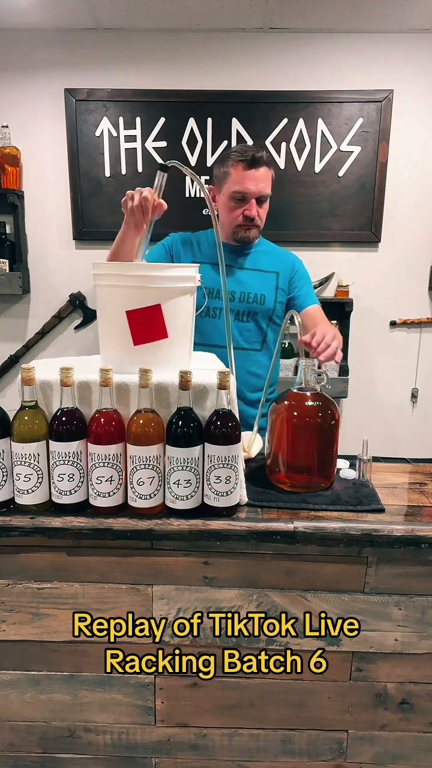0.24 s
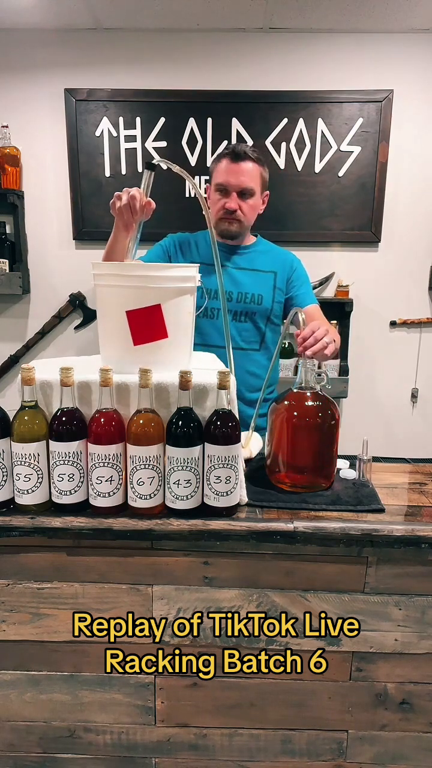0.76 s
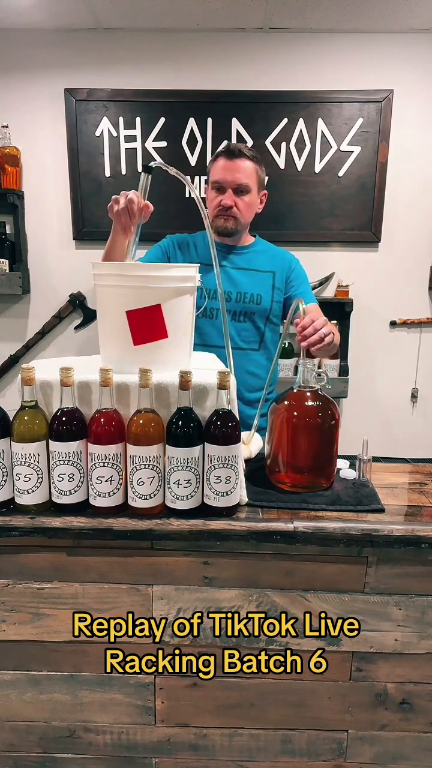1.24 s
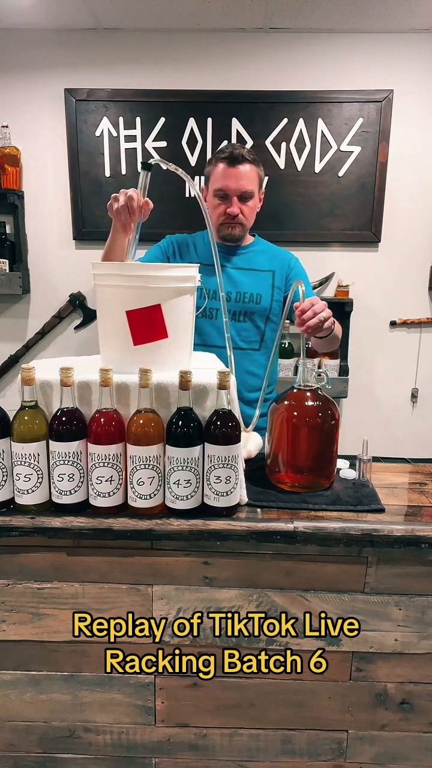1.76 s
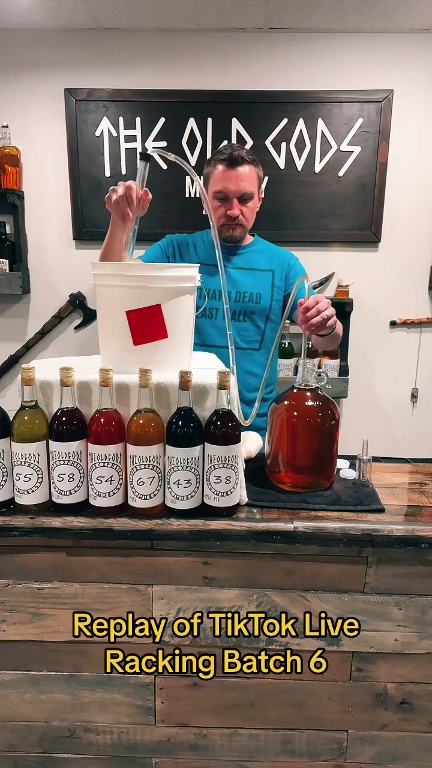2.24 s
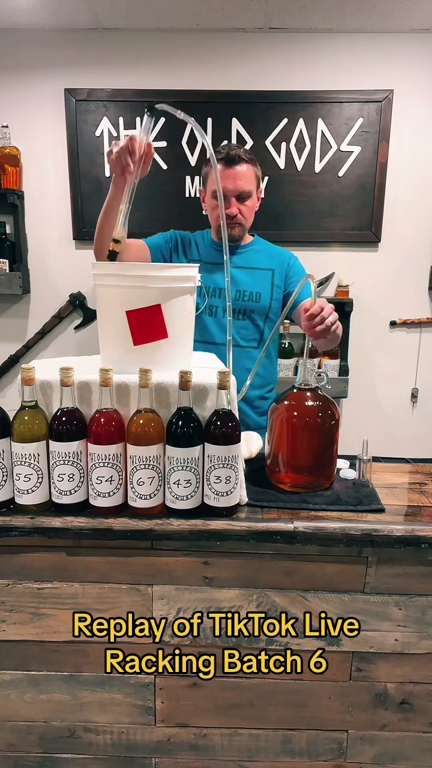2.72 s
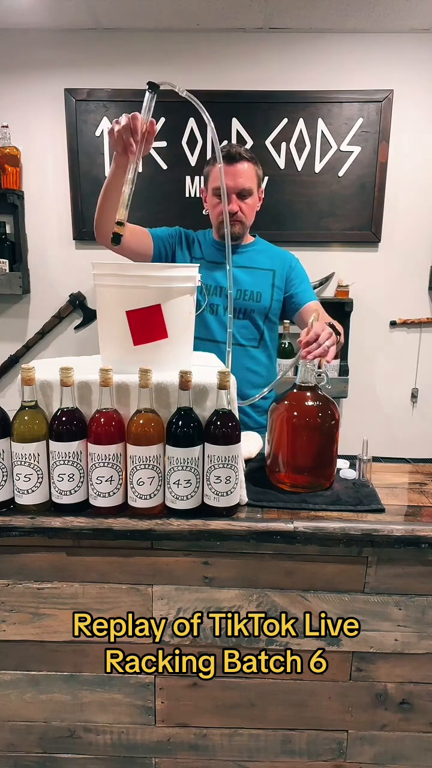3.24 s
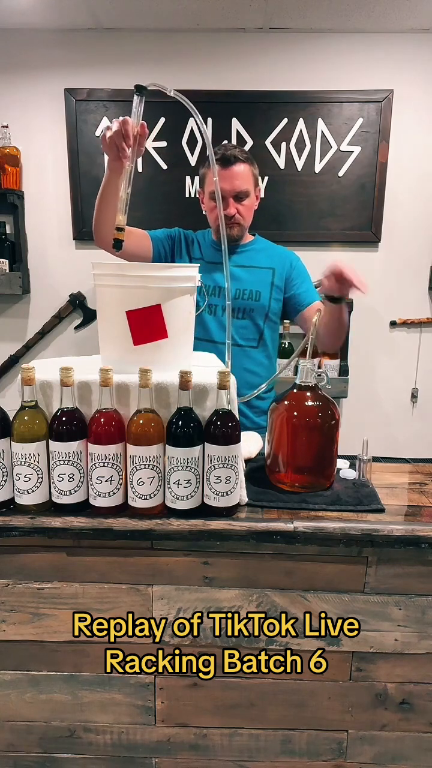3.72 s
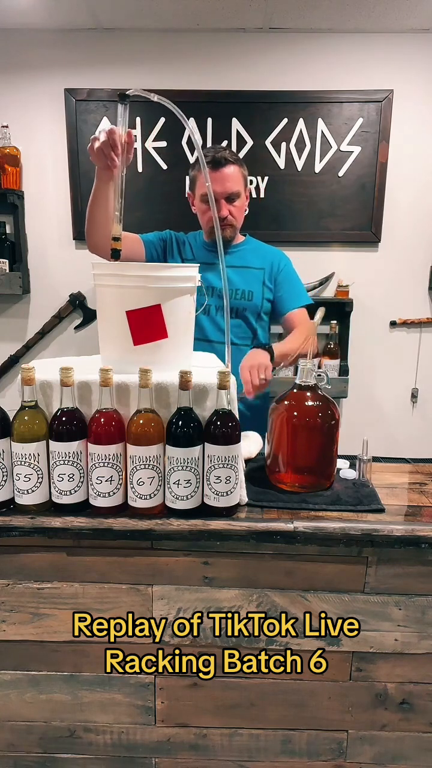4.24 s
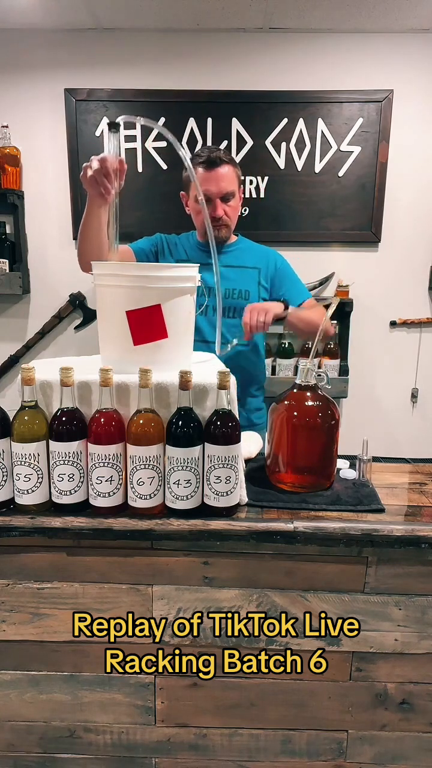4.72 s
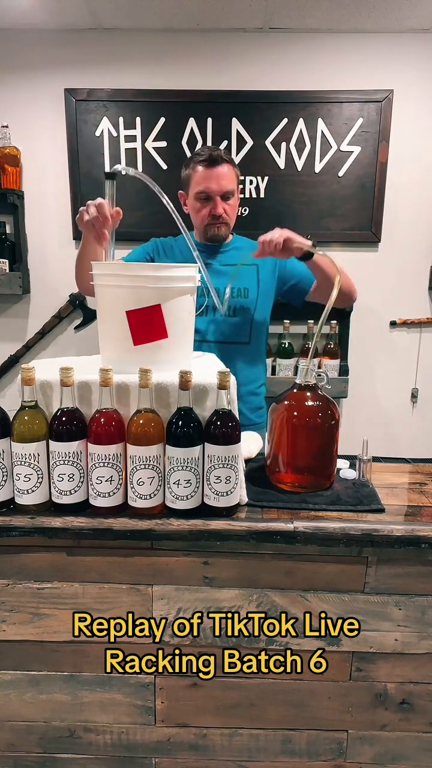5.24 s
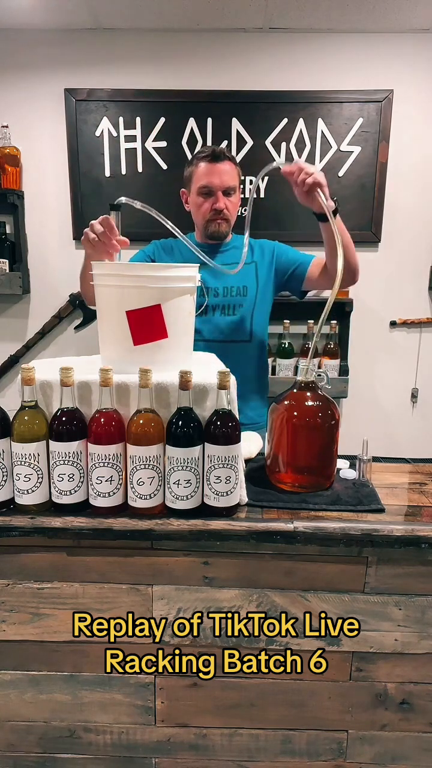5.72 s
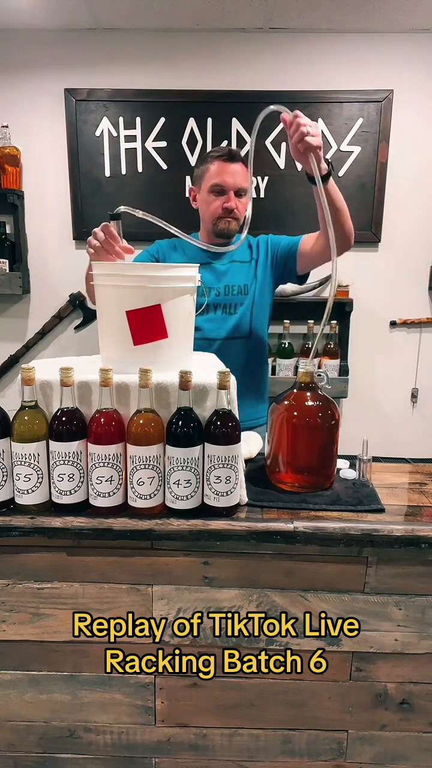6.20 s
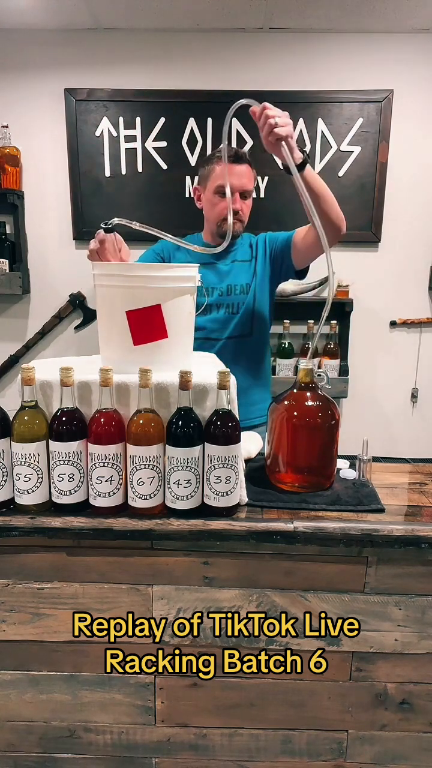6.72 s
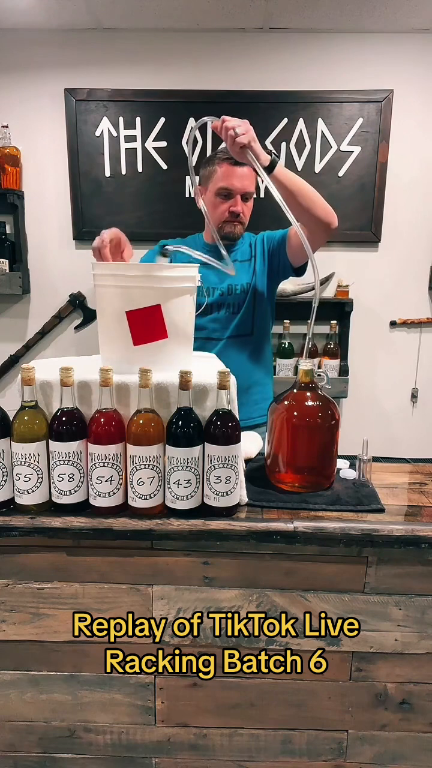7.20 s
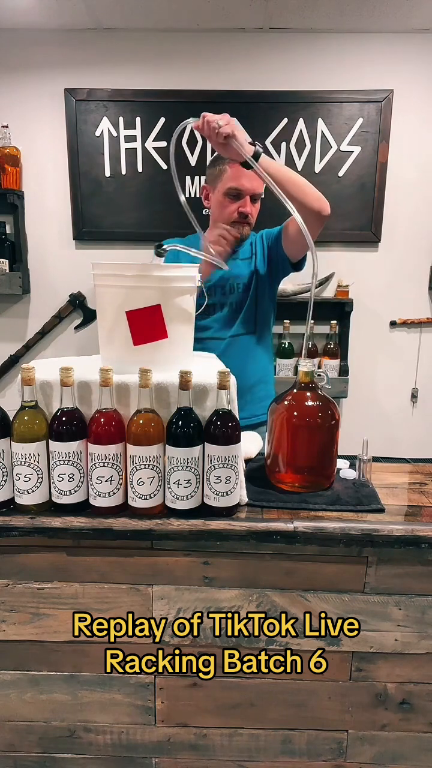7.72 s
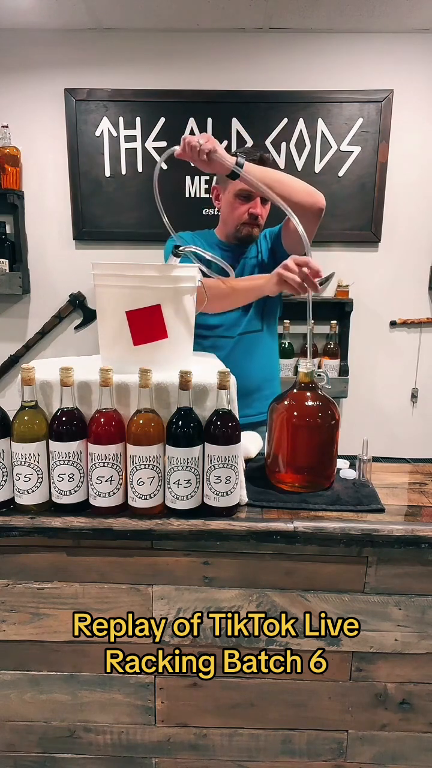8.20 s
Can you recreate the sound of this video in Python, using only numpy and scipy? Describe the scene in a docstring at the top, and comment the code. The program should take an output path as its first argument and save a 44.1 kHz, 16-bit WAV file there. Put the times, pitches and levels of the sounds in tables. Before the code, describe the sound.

A low, soft ventilation rumble runs throughout in a small, slightly live room, heard from fairly close. From about 0.3 to 2 s a thin dribble falls into a nearly full glass jug: bright plips, ringing bubbles and low hollow gulps around 0.6 to 1.7 s, then a brief hissing spurt at 1.8 s. The flow dies to scattered high drips until 3.2 s, when a hose end clinks sharply on glass at 3.3 s. Isolated drips sound at 3.7 and 3.95 s, and a very faint rub at 4.5 s. Light dull plastic taps come at 5.3 s. From 5.5 to 6.7 s the last liquid runs down, much louder, with deep gulps and splashy bubbles strongest at 6.0 to 6.4 s. A sharp, hollow, quickly repeated bucket knock hits at 7.2 s. A soft cloth-like rustle follows at 7.8 s, then small glass clinks at 8.2 and 8.4 s.

```python
"""A ventilation rumble lies under the end of a siphon run in a small room.
First a hose dribbles into the neck of a nearly full glass jug: bubbles ring, air gulps, a thin spray spurts.
Then the hose clinks on the glass, something rubs faintly, and the siphon's plastic cane knocks its bucket.
The last liquid gurgles down in a stronger run, from noise slaps and ringing air. The cane knocks again,
a soft noise rustle follows, and two last clinks, each a noise crack with ringing glass modes."""
import sys
import numpy as np
from scipy import signal
from scipy.io import wavfile

SR = 44100
rng = np.random.default_rng(int(sys.argv[2]) if len(sys.argv) > 2 else 0)


def file_out(sig):
    """Save sig as 16-bit WAV at sys.argv[1]."""
    # one column per channel
    cols = np.atleast_2d(sig).T
    # limit, then scale
    lim = np.clip(cols, -1, 1)
    pcm = np.round(lim * 32767).astype(np.int16)
    wavfile.write(sys.argv[1], SR, pcm)


N = 372777
TIME = np.arange(N) / SR  # seconds
SHORT = SR // 4  # length of a short sound, in samples


def gain_of(db):
    """Turns decibels into amplitude."""
    return 10 ** (np.asarray(db) / 20)


def evened(x):
    """Scales a sound to rms 1."""
    return x / np.sqrt(np.mean(x ** 2) + 1e-20)


def unit(x):
    """Scales a short sound to the energy of 5 ms at rms 1."""
    return x / np.sqrt(np.sum(x ** 2) / (.005 * SR) + 1e-20)


def read(points, hz):
    """Reads a curve between its points, on a log-frequency axis."""
    f, value = np.transpose(points)
    return np.interp(np.log(hz + 1), np.log(f + 1), value)


def add(mix, s, sound):
    """Mixes a sound in at time s."""
    part = mix[max(round(s * SR), 0):][:len(sound)]
    part += sound[:len(part)]


def coloured(x, points, treble_db=0, size=4096):
    """Filters with the given spectrum and a treble shelf; nothing sounds before its cause (minimum phase)."""
    hz = abs(np.fft.fftfreq(size, 1 / SR))
    shelf_db = treble_db * hz ** 2 / (hz ** 2 + 3500 ** 2)
    log_gain = np.log(gain_of(read(points, hz) + shelf_db))
    taps = np.fft.ifft(np.exp(np.conj(signal.hilbert(log_gain)))).real
    return signal.oaconvolve(x, taps[:size // 2])[:len(x)]


def resonate(x, hz, width):
    """One resonance, with a gain of about 1 at its peak; a narrow one rings longer."""
    r = np.exp(-np.pi * width / SR)
    return 2 * signal.lfilter([1 - r], [1, -r * np.exp(2j * np.pi * hz / SR)], x).real


def burst(t60, size=SHORT):
    """A puff of noise that falls by 60 dB in t60 seconds."""
    return rng.standard_normal(size) * gain_of(-60 * TIME[:size] / t60)


def ping(hz, t60, rise, glide=0, size=SHORT):
    """A dying sine with a soft start; glide is its rise in pitch, as a share per second."""
    t = TIME[:size]
    wave = np.sin(2 * np.pi * hz * (t + glide * t ** 2 / 2))
    return wave * gain_of(-60 * t / t60) * (1 - np.exp(-t / rise))


# Colour of the ventilation noise. Each row: frequency in Hz, relative level in dB per Hz.
AIR_COLOUR = [(20, -22.5), (45, -3), (75, 0), (150, -14), (220, -2), (300, -11.5), (500, -15), (900, -22),
              (3000, -29), (5500, -36), (7500, -35), (10500, -49), (12800, -39.5)]
# Room modes that the ventilation stirs. Each row: frequency in Hz, width in Hz, level in dB rms.
ROOM_MODES = [(83.2, 16, -74), (220.5, 68, -68), (298, 31, -73)]


def air():
    """Steady ventilation noise, with a few room modes that boom because they store its energy."""
    out = gain_of(-62.5) * evened(coloured(rng.standard_normal(N), AIR_COLOUR))
    for hz, width, db in ROOM_MODES:
        out += gain_of(db) * evened(resonate(rng.standard_normal(N), hz, width))
    return out


# The two runs of liquid from the hose, one list each.
# Each row: time in seconds, relative flow in dB, relative spray in dB.
LIQUID_RUNS = [
    [(0.25, -76, -91), (0.5, -71, -78), (0.56, -62.5, -69.5), (0.9, -67.5, -86), (1.0, -62, -64),
     (1.4, -65.5, -79), (1.7, -67, -78), (2.0, -80.5, -84), (2.2, -89.5, -97)],
    [(5.5, -68.5, -85), (5.63, -60, -67), (5.86, -59.5, -72), (5.98, -47.5, -61), (6.27, -54.5, -58),
     (6.57, -63, -73), (6.7, -95, -98)],
]


def flow_db(t, column=1):
    """Strength of the flow (column 1) or its spray (column 2) at times t."""
    runs = [np.array(run) for run in LIQUID_RUNS]
    return np.max([np.interp(t, run[:, 0], run[:, column], -140, -140) for run in runs], 0)


def bubble(hz, cycles=50, chirp=.3):
    """A trapped bubble falls 60 dB in a fixed number of cycles; its pitch rises as it nears the surface."""
    return ping(hz, t60=cycles / hz, rise=2.4 / hz, glide=chirp * hz / cycles, size=SR // 12)


# Resonances of the air above the liquid in the jug.
# Each row: frequency in Hz, width in Hz, relative level in dB.
JUG_AIR_MODES = [(313, 20, 8), (1032.4, 27, 4.5), (1542, 34, 1), (1896, 140, -14), (2170, 32, 2),
                 (2576, 19, -8), (2780, 260, -14.5), (3300, 83, -11), (3570, 190, -22), (3930, 69, -6),
                 (7270, 57, 3.5), (7760, 170, -2.5)]


def jug(x, ring_db):
    """Sound from the liquid's surface leaves the neck partly straight, partly after ringing in the air space."""
    ringing = sum(gain_of(db) * resonate(x, hz, width) for hz, width, db in JUG_AIR_MODES)
    return x + gain_of(ring_db) * ringing


def bubble_stream(size, lo_hz, hi_hz, per_s, cycles, count=40):
    """Bubbles at random moments, in count pitches between two limits; size holds their random strengths."""
    chance, kind, out = rng.random(N), rng.integers(0, count, N), np.zeros(N)
    shapes = [bubble(hz, cycles) * (hz / lo_hz) ** 0.46 for hz in np.geomspace(lo_hz, hi_hz, count)]
    for at in np.flatnonzero(chance < per_s / SR):
        add(out, at / SR, size[at] * shapes[kind[at]])
    return out


def dribble():
    """Large churning bubbles and a dense stream of small ones follow the flow; a fine fizz follows the spray."""
    flow, spray = gain_of(flow_db(TIME)), gain_of(flow_db(TIME, column=2))
    size = gain_of(6.5 * np.minimum(rng.exponential(1, N), 3.5)) * rng.choice([-1, 1], N)
    bubbles = jug(bubble_stream(size, lo_hz=560, hi_hz=5400, per_s=800, cycles=19), ring_db=10)
    fizz = jug(bubble_stream(size, lo_hz=4400, hi_hz=9200, per_s=320, cycles=45), ring_db=10)
    churn = jug(bubble_stream(size, lo_hz=132.0, hi_hz=600, per_s=160, cycles=6.9), ring_db=2)
    liquid = gain_of(-6.5) * evened(bubbles) + gain_of(-3) * evened(churn)
    return flow * liquid + gain_of(-8) * spray * evened(fizz)


STEADY_FLOW_DB = -65  # the flow at which lesser drops and gulps have their base levels


def beats(every_s, jitter=.7, size_scatter_db=0.5):
    """Loosely regular moments while liquid runs: rows of (s, dB over steady flow, chance size dB, chance pitch)."""
    slots = np.arange(0, N / SR, every_s)
    late, size, pitch = rng.uniform(-1, 1, (len(slots), 3)).T
    s = slots + late * jitter * every_s / 2
    rows = np.transpose([s, flow_db(s) - STEADY_FLOW_DB, size_scatter_db * size, pitch])
    return rows[flow_db(s) > -120]


def small_drops():
    """Lesser drops grow louder and deeper with the flow, which traps larger bubbles; splashes follow the spray."""
    rows = []
    for s, over, size, pitch in beats(every_s=.1):
        db = -59 + 0.65 * over + size
        hz = 2244 * 2 ** (0.31 * pitch - .025 * over)  # exponent in octaves
        spray_over = flow_db(s, column=2) - STEADY_FLOW_DB
        rows.append((s, db, hz, -64 + 0.51 * spray_over + size))
    return rows


def swarm(lo_hz, hi_hz, spread_s, count):
    """Bubbles of random size, formed within moments of one another."""
    out = np.zeros(SHORT)
    for pitch, delay, size in rng.random((count, 3)):
        hz = lo_hz * (hi_hz / lo_hz) ** pitch
        add(out, spread_s * delay ** 2, size * (1 - .5 * delay) * bubble(hz, cycles=24))
    return unit(out)


# The drops that stand out. Each row: start in seconds, relative bubble level in dB,
# starting pitch of the trapped bubble in Hz, relative splash level in dB.
CLEAR_DROPS = [(0.318, -57, 3000, -68), (0.8117, -57, 2220, -71), (0.9552, -57.5, 2110, -62),
               (1.0477, -44, 3320, -59), (1.1404, -53, 2190, -58), (1.2446, -44, 2190, -60),
               (1.3508, -60, 2640, -62), (1.5012, -50, 3060, -77), (1.592, -57, 2950, -66.5),
               (2.0193, -66, 2750, -68), (2.1304, -80, 4260, -69), (2.351, -62, 4230, -81),
               (2.5572, -57.5, 3930, -77), (2.7252, -68, 5230, -70.5), (2.8622, -48.5, 3177, -72.5),
               (2.9574, -68, 3830, -68.5), (2.9957, -56.5, 2620, -85), (3.112, -47.5, 3100, -64),
               (3.159, -57.5, 2280, -68), (3.7356, -59, 3260, -70), (3.9506, -53.5, 3910, -65.5),
               (5.6596, -43.5, 4276, -65), (5.7029, -47.5, 2280, -65), (5.7866, -43.5, 2050, -61.5),
               (5.8747, -42, 2700, -68), (5.8896, -47, 2210, -55), (6.0014, -43, 3210, -77),
               (6.0842, -46.5, 1670, -68), (6.1033, -44, 2820, -59), (6.2458, -48.5, 1810, -52.5),
               (6.3063, -42.5, 1114, -63.5), (6.343, -34, 2010, -75), (6.4917, -64, 2960, -61),
               (6.6083, -53.5, 2970, -76)]
# Colour of a splash. Each row: frequency in Hz, relative level in dB.
SPLASH_COLOUR = [(200, -7.5), (600, -8.5), (1500, -16), (3000, 6), (4500, 5.5), (6000, -9), (7800, -9),
                 (9000, -9), (10500, -12), (13000, -8)]


def drops():
    """Each drop traps one main bubble and a few satellites, and throws up a noisy splash and tiny bubbles."""
    out = np.zeros(N)
    for s, db, hz, splash_db in CLEAR_DROPS + small_drops():
        main = unit(ping(hz, t60=0.021, rise=0.0033, glide=8))
        add(out, s, gain_of(db - 5.5) * main)
        satellites = swarm(0.775 * hz, 1.442 * hz, spread_s=.02, count=7)
        add(out, s, gain_of((db + splash_db) / 2) * satellites)
        fizz = swarm(lo_hz=4980, hi_hz=8800, spread_s=0.06, count=8)
        add(out, s, gain_of(splash_db + 3.5) * fizz)
        noise = burst(t60=0.038) + 2.0 * burst(t60=0.046)
        splash = noise * (1 - np.exp(-TIME[:SHORT] / 0.0093))  # soft start
        add(out, s, gain_of(splash_db + 4) * unit(coloured(splash, SPLASH_COLOUR)))
    return jug(out, ring_db=5.0)


def small_gulps():
    """Lesser gulps grow with the flow and wander about the jug's lowest air mode."""
    rows = []
    for s, over, size, pitch in beats(every_s=.09):
        growth_db = 0.67 * over + size
        rows.append((s, -57.5 + growth_db, 333 * 2 ** (0.31 * pitch), -60 + growth_db))
    return rows


# The big gulps of air leaving the hose. Each row: start in seconds, relative level in dB,
# starting pitch in Hz, relative level of the jug's second air mode in dB.
BIG_GULPS = [(0.55, -50.5, 313, -78), (0.751, -44, 318, -70), (1.062, -43, 318, -73),
             (1.184, -48.5, 322, -46.5), (1.401, -45.5, 321, -53), (1.668, -52, 315, -80),
             (5.97, -31, 309.7, -36.5), (6.031, -34, 319, -64), (6.102, -38, 321, -55),
             (6.247, -34.5, 335.6, -36.5), (6.355, -37.5, 318, -70)]


def gulps():
    """A slug of air swells against the air space and rings its two lowest modes, with a dull slap of liquid."""
    out = np.zeros(N)
    slap_colour = [(70, -6), (120, -2), (170, -5), (250, -3.5), (400, 5), (600, -16.5),
                   (1100, -11.0), (1600, -12.5), (4000, -35.5)]  # (Hz, dB)
    for s, db, hz, upper_db in BIG_GULPS + small_gulps():
        swell = ping(hz, t60=0.075, rise=0.033, glide=0.38) * (1 - np.exp(-TIME[:SHORT] / 0.00067))
        add(out, s, gain_of(db + 3.5) * unit(swell))
        upper_hz = JUG_AIR_MODES[1][0] * rng.uniform(0.92, 1.0)
        add(out, s, gain_of(upper_db - 3.5) * ping(upper_hz, t60=0.098, rise=.003))
        slap = coloured(burst(t60=0.096), slap_colour)
        add(out, s, gain_of(db - 7) * unit(slap))
    return out


# How long the room rings. Each row: frequency in Hz, time to fall by 60 dB in seconds.
ROOM_DECAY = [(100, 0.64), (300, 0.47), (1000, 0.43), (4000, .39), (8000, 0.34), (13000, 0.38)]


def reflections(early=0, early_s=.02, size=SR * 3 // 4):
    """Dense echoes of random sign, each band dying at its own speed; near surfaces strengthen the first ones."""
    t = TIME[:size]
    taps = rng.choice([-1., 1.], size) * (rng.random(size) < 5000 / SR) * (t > .001)
    hz, frame_s, z = signal.stft(taps, SR, nperseg=256)
    fading = gain_of(-60 * frame_s / read(ROOM_DECAY, hz)[:, None])
    tail = signal.istft(z * fading, SR, nperseg=256)[1][:size]
    return tail / np.linalg.norm(tail) * (1 + early * np.exp(-t / early_s))


def room(x):
    """The room's answer to a sound: all its echoes added up."""
    return signal.oaconvolve(x, reflections())[:N]


def spurt(start_s=1.778, rise_s=0.007, t60=0.31):
    """A thin spurt of spray: noise in one narrow band that starts fast and dies away."""
    age = np.maximum(TIME - start_s, 0)
    level = np.minimum(age / rise_s, 1) * gain_of(-61 - 60 * age / t60)
    return level * evened(resonate(rng.standard_normal(N), hz=5500, width=530))


def strikes(rows, modes, colour, early, early_s, crack_db, ring_db, favour_db, thinning):
    """Each blow is a crack, scattered by near surfaces and the room, and the ring of the object's modes."""
    out, t = np.zeros(N), TIME[:SR]
    for s, db, hard_db, favoured_hz in rows:
        bass = [(300, thinning * (db + 28)), (1000, 0)]  # (Hz, dB): blows below -28 dB have thinner bass
        crack = unit(coloured(reflections(early, early_s), colour))
        add(out, s, gain_of(db + crack_db) * coloured(crack, bass, hard_db))
        for k, (hz, level, t60) in enumerate(modes):
            nearness = np.exp(-(np.log(hz / favoured_hz) / 0.11) ** 2)  # 1 when struck on an antinode
            mode_db = db + ring_db + level + read(bass, hz) + favour_db * nearness
            sign = (-1) ** k
            add(out, s, sign * gain_of(mode_db - 60 * t / t60) * np.sin(2 * np.pi * hz * t))
    return out


# The hose end taps the jug. Each row: start in seconds, relative level in dB,
# hardness as treble in dB, pitch in Hz of the modes that the contact point favours.
HOSE_TAPS = [(3.2805, -51.5, 29.5, 1020), (3.2855, -30, -32.5, 3250), (8.191, -46.5, -21, 1284),
             (8.4075, -46, -2.5, 2550)]
# Modes of the glass. Each row: frequency in Hz, relative level in dB, time to fall by 60 dB in seconds.
GLASS_MODES = [(1065, -8, 1.1), (1197, -11, 1.3), (1225, -9, 1.3), (1733, -12, .9), (1997, -4, .3),
               (2110, -4, .25), (2400, -7, .25), (2589, -8, .4), (2876, -3, .25), (2978, -5, .33),
               (3150, -5, .2), (3255, -6, .3), (3312, -6, .3), (3620, -8, .4), (3916, -4, .22),
               (4151, -10, .35), (7682, -11, .16)]
# Colour of the crack on glass. Each row: frequency in Hz, relative level in dB.
GLASS_CRACK = [(200, -12), (900, -9), (2000, 4.5), (2500, 7.5), (3100, 16.5), (4200, 5), (5500, -3),
               (7800, -4.5), (10000, -20.5), (13000, -21)]


def glass_clinks():
    """The hose end taps the jug, and the stiff glass rings in many high modes."""
    return strikes(HOSE_TAPS, GLASS_MODES, GLASS_CRACK, early=2.0, early_s=0.0071,
                   crack_db=2.5, ring_db=-19, favour_db=11, thinning=0)


def rustle(middle_s, half_s, db, colour):
    """Soft friction noise that swells and fades with one stroke, 18 dB weaker at the stroke's ends."""
    level = gain_of(db - 18 * np.minimum(((TIME - middle_s) / half_s) ** 2, 10))
    return level * evened(coloured(rng.standard_normal(N), colour))


# One faint rub. Its values: middle in seconds, half length in seconds, level in dB.
RUB_STROKE = (4.5, 0.19, -71.5)
# Colour of the rub. Each row: frequency in Hz, relative level in dB.
RUB_COLOUR = [(300, -25), (800, 0), (1400, -6), (2200, -10), (3200, -1), (4300, -23), (10000, -38)]


def hose_rub():
    """A faint stroke of friction noise, probably the hand on the hose."""
    return rustle(*RUB_STROKE, RUB_COLOUR)


# The cane strikes the bucket. Each row: start in seconds, relative level in dB,
# hardness as treble in dB, pitch in Hz of the modes that the contact point favours.
CANE_KNOCKS = [(5.331, -46.5, -22, 2390), (5.345, -42, -25, 604), (7.1816, -30.5, 0.5, 1120),
               (7.1872, -26, -13.5, 316), (7.2115, -30, -5.5, 1880)]
# Modes of the bucket and its stand.
# Each row: frequency in Hz, relative level in dB, time to fall by 60 dB in seconds.
BUCKET_MODES = [(76, -3, .7), (263, -3, .28), (310, -1, .35), (417, -2, .22), (560, -4, .22), (685, -5, .2),
                (792, -4, .2), (963, -5, .18), (992, -6, .22), (1063, -5, .22), (1190, -6, .2),
                (1292, -5, .2), (1624, -1, .2), (1659, -1, .2), (1783, -2, .2), (1917, -2, .18),
                (1997, 2, .2)]
# Colour of the crack on the bucket. Each row: frequency in Hz, relative level in dB.
BUCKET_CRACK = [(35, -35), (60, -23), (193, -11.5), (290, -3), (486, -18.5), (557, -9), (893, -10.5),
                (1250, -14.5), (1370, -11.5), (1960, -12), (2690, -14), (4720, -18.5), (6770, -11),
                (9920, -28.5), (13000, -29.5)]


def bucket_knocks():
    """The cane knocks the bucket, whose low modes ring longest; lighter blows have less bass."""
    return strikes(CANE_KNOCKS, BUCKET_MODES, BUCKET_CRACK, early=1.56, early_s=0.014,
                   crack_db=6.5, ring_db=-14, favour_db=11.0, thinning=0.16)


# One soft rustle. Its values: middle in seconds, half length in seconds, level in dB.
SLEEVE_STROKE = (7.81, 0.13, -58.5)
# Colour of the rustle. Each row: frequency in Hz, relative level in dB.
CLOTH_COLOUR = [(100, -5), (300, 19), (600, -19), (1200, -3.5), (2000, -4.5), (3000, -17), (8000, -27.5)]


def sleeve_rustle():
    """A soft stroke of friction noise, probably the sleeve as the arm swings."""
    return rustle(*SLEEVE_STROKE, CLOTH_COLOUR)


def scene():
    """All sources stand in the middle; only the treble of the room and of the ventilation spreads sideways."""
    liquid = dribble() + gain_of(-2.0) * drops() + spurt()
    gurgle = gulps()
    glass = glass_clinks()
    bucket = bucket_knocks()
    handling = hose_rub() + sleeve_rustle()
    echo = room(gain_of(-0.5) * liquid + gain_of(-3.5) * gurgle)
    mid = air() + liquid + gurgle + glass + handling + bucket + echo
    side_echo = room(gain_of(-6) * liquid + gain_of(-6) * bucket + gain_of(-18) * glass)
    spread = side_echo + gain_of(-3.5) * air()
    treble_only = signal.firwin(401, 4150, pass_zero=False, fs=SR)
    side = signal.oaconvolve(spread, treble_only, "same")
    return np.array([mid + side, mid - side])


def record(dry):
    """Cuts away everything above the upper band limit of 13150 Hz."""
    low_pass = signal.firwin(511, 13150, window=("kaiser", 9), fs=SR)
    return signal.oaconvolve(dry, low_pass[None], "same")


dry = scene()
out = record(dry)
file_out(out)
```